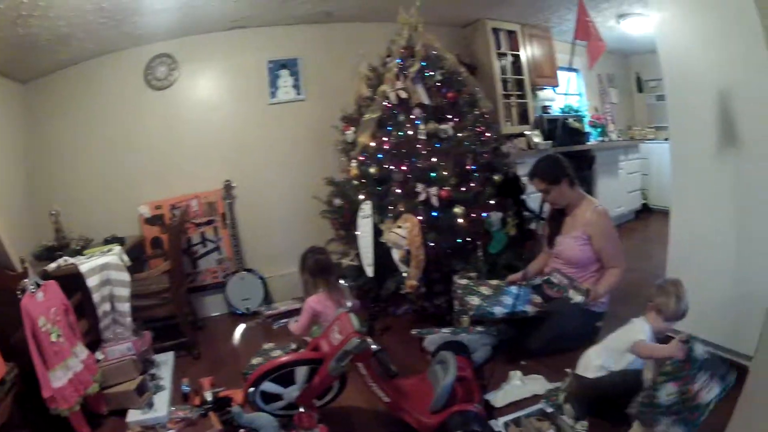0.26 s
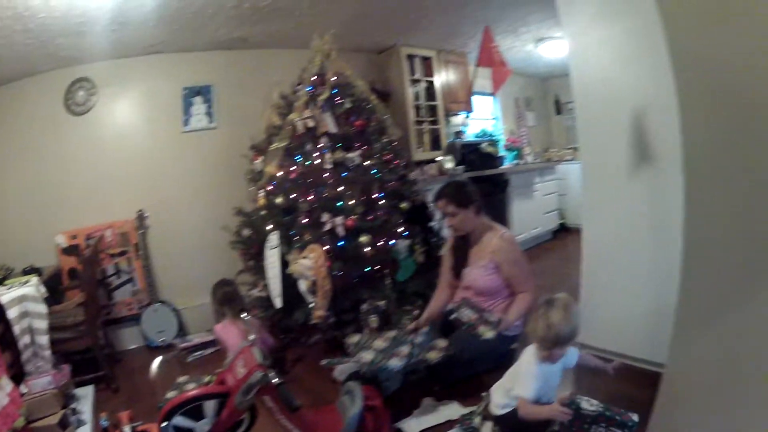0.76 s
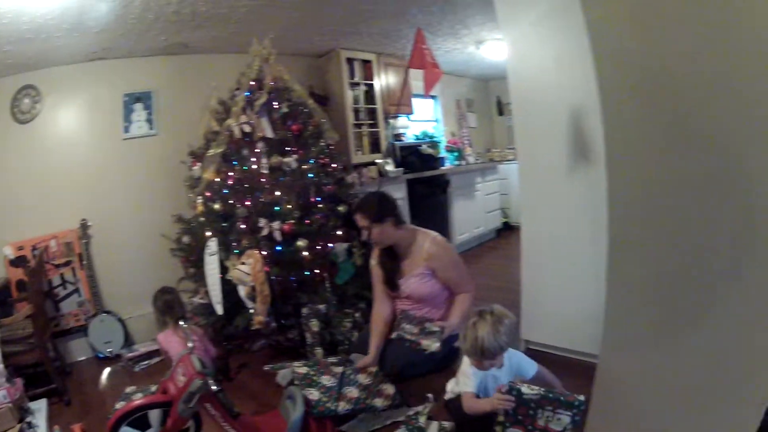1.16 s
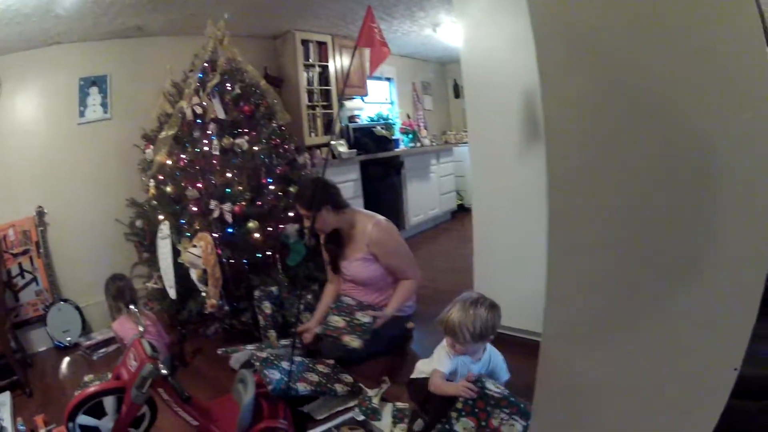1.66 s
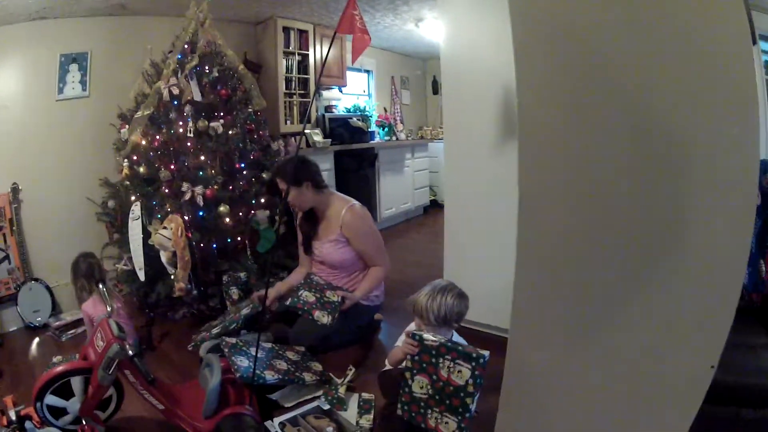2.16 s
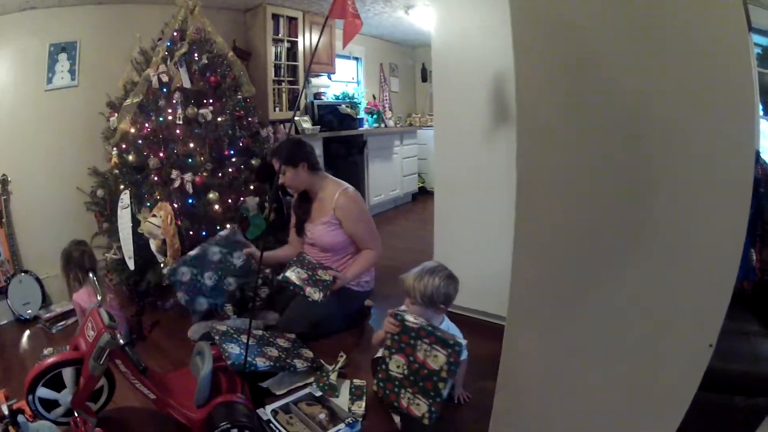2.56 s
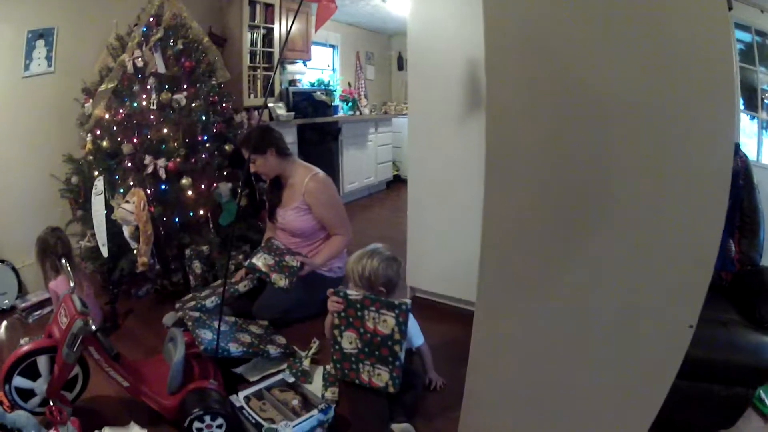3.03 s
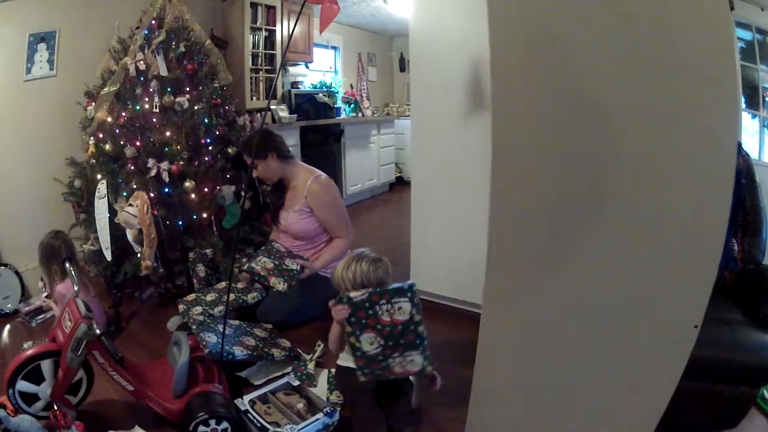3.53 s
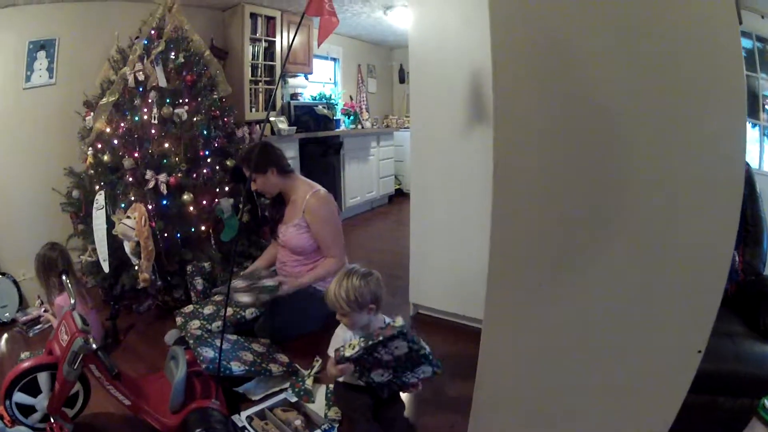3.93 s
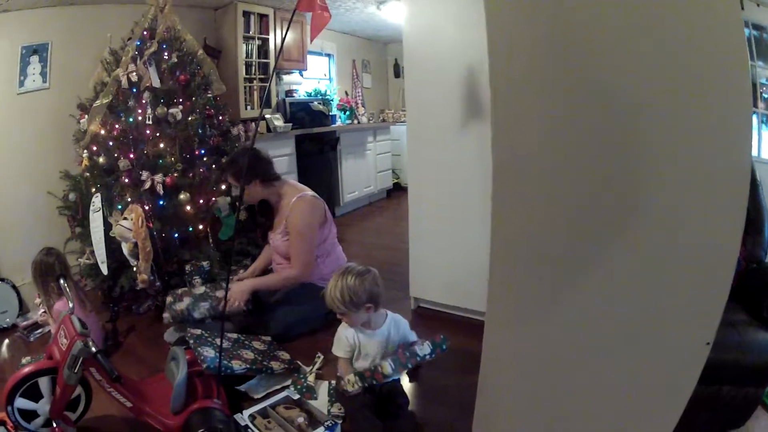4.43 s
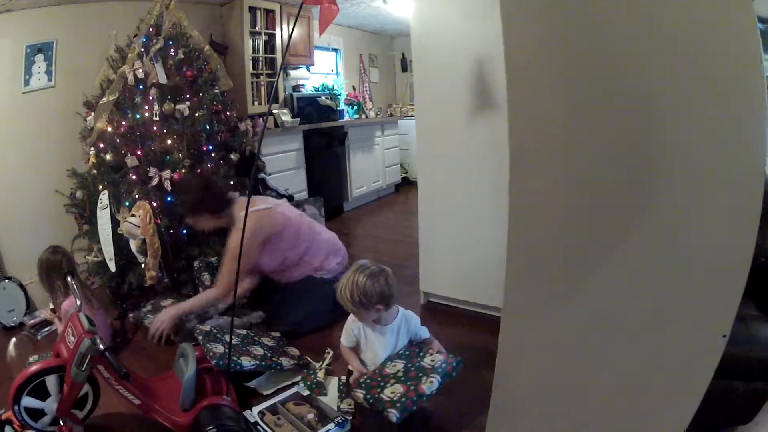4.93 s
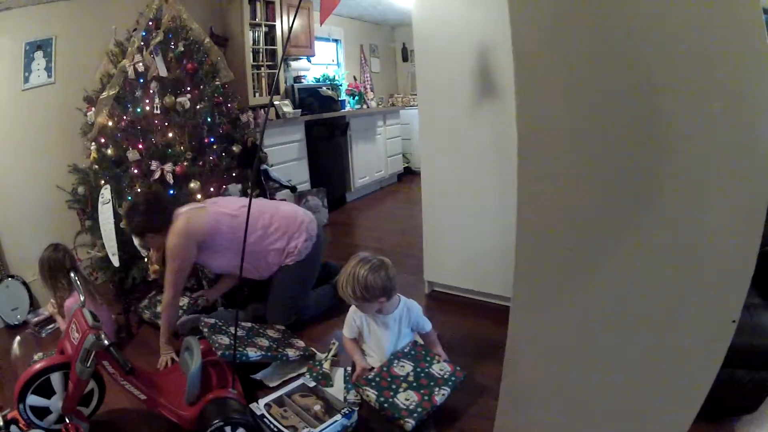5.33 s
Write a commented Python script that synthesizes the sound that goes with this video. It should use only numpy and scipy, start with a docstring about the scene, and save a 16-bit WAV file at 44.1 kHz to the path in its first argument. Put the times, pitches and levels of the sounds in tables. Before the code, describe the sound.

Presents are being handled on a hard floor: soft thump first, several boxy knocks, low woody scraping around two seconds, and the loudest bang just before three. After a quieter pause, paper crackles and scrunches with another knock past four seconds, then small taps and rustles. Faint house murmur, close room reflections, low camera bumps and a gritty treble edge from a cheap handheld microphone.

```python
"""A living room with a wooden floor, where wrapped presents are handled.
Hollow boxes knock (ringing modes) and slide (stick-slip grains through resonances).
Paper rustles, snaps, scrunches and squeaks; the room answers briefly over a steady murmur.
The small camera is nudged, samples slowly and holds each sample: a thin fizz above every sound."""
import sys
import numpy as np
from scipy import signal
from scipy.io import wavfile
from scipy.ndimage import uniform_filter1d

SR = 44100
rng = np.random.default_rng(int(sys.argv[2]) if len(sys.argv) > 2 else 0)


def pcm_store(signal):
    """Save signal as 16-bit PCM."""
    levels = np.round(np.clip(np.atleast_2d(signal), -1, 1) * 32767)
    wavfile.write(sys.argv[1], SR, levels.astype(np.int16).T)


N = 246519
TIME = np.arange(N) / SR
EVENT_T = np.arange(int(0.4 * SR)) / SR
ROOM_T60_S = 0.41


def amp(db):
    """Decibels to gain."""
    return 10 ** (np.asarray(db) / 20)


def unit(x):
    """Scales to an rms of one."""
    return x / np.sqrt(np.mean(x ** 2) + 1e-20)


def crest(x, size=441):
    """Scales so that the loudest hundredth of a second has an rms of one."""
    return x / np.sqrt(uniform_filter1d(x ** 2, size).max() + 1e-20)


def steady(x, size=1764):
    """Evens out the loudness, as the steady pressure of a hand does."""
    return x / np.sqrt(abs(uniform_filter1d(x ** 2, size)) + 1e-6 * np.mean(x ** 2))


def read(points, hz):
    """Reads a table on a log-frequency axis."""
    table_hz, value = np.transpose(points)
    return np.interp(np.log(hz + 1), np.log(table_hz + 1), value)


def add(mix, start_s, sound):
    """Adds a sound to the mix at start_s."""
    part = mix[max(round(start_s * SR), 0):][:len(sound)]
    part += sound[:len(part)]


def colour(x, points, tilt_db_per_oct=0, size=4096):
    """Minimum-phase filter with the given spectrum, tilted about 1 kHz."""
    hz = abs(np.fft.fftfreq(size, 1 / SR))
    octaves = np.log2(np.clip(hz, 100, 6000) / 1000)
    log_gain = np.log(amp(read(points, hz) + tilt_db_per_oct * octaves))
    spectrum = np.exp(np.conj(signal.hilbert(log_gain)))
    taps = np.fft.ifft(spectrum).real[:size // 2]
    return signal.oaconvolve(x, taps)[:len(x)]


def resonate(x, hz, width_hz):
    """A resonance of gain one at a fixed pitch, or following the curve hz."""
    r = np.exp(-np.pi * max(width_hz, 1) / SR)
    if np.ndim(hz) == 0:
        return 2 * signal.lfilter([1 - r], [1, -r * np.exp(2j * np.pi * hz / SR)], x).real
    turn = np.exp(2j * np.pi * np.cumsum(hz) / SR)
    # shift the note to 0 Hz, low-pass, shift back
    return 2 * (turn * signal.lfilter([1 - r], [1, -r], x / turn)).real


def grains(count, per_s, spread_db):
    """Random clicks of either sign, their levels spread exponentially in dB."""
    size, sign, chance = rng.random((3, count))
    hit = chance < per_s / SR
    level_db = spread_db * np.minimum(-np.log(size[hit]), 4)
    out = np.zeros(count)
    out[hit] = amp(level_db) * np.sign(sign[hit] - 0.5)
    return out


def room(x, wet_db, early_db=-1, early_s=0.0099, t60_s=ROOM_T60_S):
    """Direct sound, close reflections from floor and walls, and a short tail; new for every call."""
    taps = rng.standard_normal(len(EVENT_T)) * (EVENT_T > 0.002)
    tail = taps * np.exp(-np.log(1000) * EVENT_T / t60_s)
    early = taps * np.exp(-EVENT_T / early_s)
    response = tail / np.linalg.norm(tail) + amp(early_db) * early / np.linalg.norm(early)
    response = amp(wet_db) * response
    response[0] += 1
    return signal.fftconvolve(x, response)[:len(x)]


def crumple(decay_s, per_s, crackle_db):
    """One click followed by a dying run of others."""
    run = grains(len(EVENT_T), per_s, spread_db=3) * np.exp(-EVENT_T / max(decay_s, 0.001))
    run = amp(crackle_db) * run / (np.linalg.norm(run) + 1e-9)
    run[0] += 1
    return run


def ring(hz, t60_s):
    """One dying mode, as a turning and shrinking complex number."""
    return np.exp((2j * np.pi * hz - np.log(1000) / max(t60_s, 0.01)) * EVENT_T)


def pressure(rows, db, idle_db=-120, build=1.26, ease=1.8):
    """Each stroke of a hand builds up and eases off along a power curve; overlaps add in power."""
    power = amp(idle_db) ** 2
    for (start_s, swell_s, release_s, *_), peak in zip(rows, amp(db)):
        rise = np.clip((TIME - start_s) / swell_s, 0, 1)
        fall = np.clip(1 - (TIME - start_s - swell_s) / release_s, 0, 1)
        power = power + (peak * rise ** build * fall ** ease) ** 2
    return np.sqrt(power)


# murmur spectrum: (frequency [Hz], relative density [dB])
AIR_COLOUR = [(12, -45), (20, -2), (64, 2), (163, -0.5), (326, -0.5), (526, -0.5), (652, 0), (1240, -19),
              (1820, -20), (2150, -17), (3150, -14.5), (3810, -21.5), (5080, -19.5), (6000, -36.5),
              (7800, -61), (13200, -120)]


def air(level_db=-56.5):
    """Steady murmur of the house: coloured noise."""
    return amp(level_db) * unit(colour(rng.standard_normal(N), AIR_COLOUR))


# hand strokes over the wrapping: (time [s], swell [s], release [s], level before trim [dB])
RUSTLE_STROKES = [(-0.1, .33, .25, -56), (0.52, .05, 0.27, -66.5), (1.1, 0.036, 0.53, -58.5),
                  (1.43, 0.043, 0.54, -58.5), (1.68, 0.022, 0.29, -60), (1.79, 0.11, 0.93, -59),
                  (2.052, 0.066, 0.095, -50), (2.2, 0.1, 0.32, -58), (2.42, 0.052, 0.23, -54),
                  (2.74, 0.071, 0.2, -57), (3.2, .055, .4, -70), (3.79, 0.031, .25, -58.5),
                  (4.01, 0.052, 0.093, -63.5), (4.61, 0.076, .12, -62.5), (4.73, 0.061, 0.12, -58),
                  (4.91, 0.033, .25, -63.5), (5.24, 0.019, 0.33, -60.5), (5.43, 0.075, 0.14, -53.5)]
# paper spectrum, also for snaps, before tilt: (frequency [Hz], relative density [dB])
PAPER_COLOUR = [(300, -30), (900, -6.5), (1400, -2), (1800, -2.5), (2300, 4), (3100, 3), (3900, -5.5),
                (5000, -7), (6000, -25), (8000, -46.5)]


def rustle(trim_db=-1, layer_count=5, idle_db=-77.5):
    """Fine paper crackle: several random layers with room, summed for an even colour; never quite still."""
    *_, db = np.transpose(RUSTLE_STROKES)
    layers = sum(room(grains(N, per_s=90, spread_db=3), wet_db=-2) for _ in range(layer_count))
    crackle = colour(layers, PAPER_COLOUR, tilt_db_per_oct=5)
    return pressure(RUSTLE_STROKES, db + trim_db, idle_db) * steady(crackle, size=4410)


# box pushes along the floor:
# (time [s], swell [s], release [s], level [dB], hollow note [Hz], lid hum before trim [dB])
SLIDE_PUSHES = [(0.72, 0.018, 0.17, -69, 445, -50.5), (0.85, 0.031, 0.54, -56, 490, -61),
                (0.95, 0.027, 0.035, -53.5, 457, -59), (1.14, 0.1, 0.11, -46.5, 333, -35),
                (1.426, 0.042, 0.27, -60, 345, -37), (1.588, .015, .12, -49.5, 352, -42),
                (1.81, 0.049, 0.14, -54.5, 430, -47.5), (1.91, 0.11, 0.2, -38.5, 435, -35),
                (2.06, 0.057, 0.12, -30, 340, -33), (2.15, 0.08, 0.3, -46, 310, -64),
                (2.22, 0.17, 0.65, -44, 400, -52), (2.43, 0.057, 0.088, -36, 474, -66),
                (2.6, 0.042, 0.056, -49, 560, -62.5), (3.145, 0.03, 0.043, -62, 428, -51),
                (3.235, 0.038, 0.11, -48.5, 348, -62), (3.76, .14, 0.12, -48, 380, -70),
                (4.02, 0.054, 0.046, -52.5, 560, -66), (4.1, 0.03, 0.043, -47.5, 480, -70),
                (4.29, 0.072, 0.16, -42.5, 466, -57), (4.68, 0.035, 0.1, -47.5, 447, -54),
                (4.754, 0.031, 0.13, -41.5, 340, -52), (5.459, 0.049, 0.24, -45, 350, -57)]
# wall resonances of a sliding box: (frequency [Hz], width [Hz], gain [dB])
SLIDE_WALLS = [(299, 11.7, 2.5), (441, 22, 3), (642, 26, -2)]
# rubbing spectrum: (frequency [Hz], relative density [dB])
RUB_COLOUR = [(60, -38), (140, -14.5), (220, 2.5), (330, -7.5), (480, -5), (680, -4), (850, -4.5),
              (1100, -21), (1600, -27), (3000, -68), (6000, -65)]


def slides(hollow_db=-5, hollow_width_hz=50, lid_trim_db=-2, lid_hz=345, lid_width_hz=10, idle_db=-69):
    """Cardboard sticks and slips: dense little jerks drive the hollow box, its walls and its lid."""
    start_s, swell_s, _, db, note_hz, hum_db = np.transpose(SLIDE_PUSHES)
    jerks = room(grains(N, per_s=900, spread_db=-1), wet_db=-0.5)
    body = colour(jerks, RUB_COLOUR)
    walls = sum(amp(gain_db) * resonate(body, hz, width_hz) for hz, width_hz, gain_db in SLIDE_WALLS)
    # the note glides from push to push
    hollow = resonate(body, np.interp(TIME, start_s + swell_s, note_hz), hollow_width_hz)
    rub = steady(unit(body) + unit(walls) + amp(hollow_db) * unit(hollow))
    lid = steady(resonate(body, lid_hz, lid_width_hz))
    rub = rub * pressure(SLIDE_PUSHES, db, idle_db)
    return rub + lid * pressure(SLIDE_PUSHES, hum_db + lid_trim_db)


# camera body nudges: (time [s], envelope peak [dB], frequency [Hz], decay time constant [s])
CAMERA_NUDGES = [(0.13, -40, 60.4, 0.084), (5.214, -39, 28.5, 0.06)]


def nudges(rise_s=0.014):
    """Deep, soft wobbles of the hand-held camera: swelling, dying low sines."""
    out = np.zeros(N)
    for start_s, db, hz, decay_s in CAMERA_NUDGES:
        swell = (1 - np.exp(-EVENT_T / rise_s)) * np.exp(-EVENT_T / decay_s)
        wobble = swell / swell.max() * np.sin(2 * np.pi * hz * EVENT_T)
        add(out, start_s, -amp(db) * wobble)
    return out


# slap spectrum: (frequency [Hz], relative density [dB])
SLAP_COLOUR = [(500, -17), (1300, -21.5), (1700, -19), (2300, -11), (2900, -5), (3400, -11), (4000, -21),
               (5000, -23), (6000, -37), (8000, -66)]


def wrapping_slap(layer_count=4):
    """The wrapping slaps: several random crumples summed for an even spectrum."""
    layers = sum(room(crumple(decay_s=0.0014, per_s=2500, crackle_db=8.5), wet_db=9.5)
                 for _ in range(layer_count))
    return colour(layers, SLAP_COLOUR)


# box landings, levels before trim:
# (time [s], box [dB], panel note [Hz], floor thump [dB], paper slap [dB], panel ring re blow [dB],
#  brightness [dB/octave], landing time constant [s])
BOX_KNOCKS = [(0.167, -23.5, 249.6, -30, -54, -5.5, -4.5, 0.0025),
              (0.196, -31.5, 234, -36, -48.5, 4.5, 7, 0.0038), (0.772, -38, 430, -65, -70, -9, 2.5, 0.0016),
              (1.033, -16.5, 482, -52, -42, -17, -3, 0.0019),
              (1.04, -18, 196, -38, -43, -7.5, -0.5, 0.0063),
              (1.215, -30.5, 248, -43, -57, -1.5, 1, 0.0025),
              (1.293, -13.5, 229.8, -39.5, -42.5, -5.5, -4, 0.0027),
              (1.308, -9.5, 345, -39, -39.5, 1.5, -2.5, 0.0028),
              (1.522, -25.5, 339, -42.5, -58, -8, 1.5, 0.0015), (1.602, -34, 345, -48, -66, 9, 1, 0.001),
              (1.658, -29, 188, -46.5, -56, 1, -1.5, 0.0045), (2.606, -38, 690, -67, -54, -4, 10.5, 0.0022),
              (2.835, -0.5, 331.3, -35, -23.5, -9, 1, 0.0025), (2.847, -14.5, 303, -31, -35, -7, 4, 0.0017),
              (3.233, -45, 667, -91, -62, 6, 6, 0.00096), (3.329, -54, 640, -65, -76, 6, -3, 0.0022),
              (3.74, -40.5, 320, -51, -73, -4, 3.5, 0.0018), (3.78, -38.5, 307, -74, -61, -9, -0.5, 0.0021),
              (4.253, -32.5, 642, -48, -41, -4, 10, 0.0051),
              (4.267, -25, 639.4, -55, -45, -5.5, -2.5, 0.0042),
              (4.408, -14.5, 207.4, -31, -38, -7.5, -3.5, 0.0019),
              (4.777, -35, 327, -62, -76, 1, 1, 0.0021), (5.115, -22, 253.5, -49, -46, -6, -3, 0.0053),
              (5.534, -25, 228, -48, -72, -4, -4.5, 0.00082)]
# cardboard box modes: (frequency [Hz], relative level before tilt [dB], t60 [s])
BOX_RINGS = [(185, 1.5, 0.12), (225, -9.5, 0.26), (339, 8.5, 0.08), (501, -17, 0.15), (582, 1.5, 0.23),
             (680, -4, 0.45), (752, -6, 0.2), (815, -12.5, 0.29), (886, -20, 0.31), (880, -46, 0.81),
             (1020, -23, 0.2)]
# blow spectrum before tilt: (frequency [Hz], relative density [dB])
BLOW_COLOUR = [(60, -51), (130, -10.5), (190, 0), (250, -0.5), (330, 7), (480, 3), (700, 0), (900, -10.5),
               (1100, -20.5), (1600, -30), (3000, -73)]
# floor thump spectrum: (frequency [Hz], relative density [dB])
THUMP_COLOUR = [(20, -11), (45, -2), (65, 5), (110, 2), (160, -1.5), (300, -59), (800, -81)]


def knocks(walls_db=-4, panel_t60_s=0.2, box_trim_db=-7, thump_trim_db=-3, slap_trim_db=-3):
    """A box lands: a hollow blow, its ringing walls, a thump in the floor and a slap of the wrapping."""
    out, click = np.zeros(N), signal.unit_impulse(len(EVENT_T))
    box_push, floor_push = colour(click, BLOW_COLOUR), colour(click, THUMP_COLOUR)
    mode_hz, mode_db, _ = np.transpose(BOX_RINGS)
    modes = np.array([ring(hz, t60_s) for hz, _, t60_s in BOX_RINGS])
    for start_s, db, note_hz, thump_db, slap_db, panel_db, tilt_db, landing_s in BOX_KNOCKS:
        # a box that meets the floor edge first swells more slowly
        rise = 1 - np.exp(-EVENT_T / max(landing_s, 0.0003))
        # each mode starts at a random phase
        phase = np.exp(2j * np.pi * rng.random(len(modes)))
        mode_gain = amp(mode_db + tilt_db * np.log2(mode_hz / note_hz))
        walls = ((phase * mode_gain) @ modes).real
        tilted_push = colour(box_push, [(100, 0.012), (6000, 0)], tilt_db)  # near-flat: tilt only
        blow = room(tilted_push, wet_db=-0.5, t60_s=0.33)
        panel = ring(note_hz, panel_t60_s).imag
        hollow = crest(blow) + amp(walls_db) * crest(walls) + amp(panel_db) * crest(panel)
        thump = room(floor_push, wet_db=6.5)
        slap = wrapping_slap()
        add(out, start_s, amp(db + box_trim_db) * crest(rise * hollow))
        add(out, start_s, amp(thump_db + thump_trim_db) * crest(rise * thump))
        add(out, start_s, amp(slap_db + slap_trim_db) * crest(rise * slap))
    return out


# paper snaps, levels before trim:
# (time [s], level [dB], crumple time constant [s], brightness [dB/octave], sheet flap [dB])
PAPER_SNAPS = [(0.4081, -32, 0.036, -7.5, -43), (0.4189, -35.5, 0.0057, -3.5, -39),
               (0.4328, -36.5, 0.0071, -6, -41), (0.4534, -36.5, 0.0057, -1, -53),
               (0.4757, -36.5, 0.011, -4.5, -41.5), (0.8076, -37.5, 0.001, 1.5, -67),
               (0.8291, -48, 0.008, -4.5, -51), (1.286, -41, 0.015, 6, -67),
               (2.1845, -36, 0.0064, 7, -43.5), (2.2112, -38.5, 0.005, -9, -57),
               (2.5411, -34.5, 0.0038, -9.5, -34), (2.7333, -31, 0.01, -1.5, -35.5),
               (2.7422, -33, 0.027, 2, -40), (3.506, -50, 0.008, 7, -74), (3.569, -50, 0.0069, -4, -78),
               (3.7448, -45, 0.012, 17, -53), (3.8252, -46.5, 0.011, 7, -49.5),
               (3.992, -48.5, 0.0038, 6, -67), (4.033, -52.5, 0.004, -2, -53),
               (4.2487, -35.5, 0.02, -2, -32), (4.356, -46.5, 0.011, 14, -60),
               (4.5157, -43.5, 0.033, 9.5, -42.5), (4.8274, -47.5, 0.021, -1, -49),
               (4.91, -55, 0.006, -3, -57.5), (5.231, -37, 0.0025, 0.5, -46),
               (5.4076, -49.5, 0.0072, 1, -55), (5.5074, -41, 0.0032, 1, -71)]
# sheet flap spectrum: (frequency [Hz], relative density [dB])
FLAP_COLOUR = [(60, -35), (200, 4.5), (400, 1), (680, 5.5), (850, 10.5), (1100, -17), (2000, -33.5),
               (6000, -40.5)]


def snaps(snap_trim_db=-8, flap_trim_db=-4):
    """A crease buckles in a run of clicks, and the sheet around it flaps."""
    out = np.zeros(N)
    for start_s, db, decay_s, tilt_db, flap_db in PAPER_SNAPS:
        run = room(crumple(decay_s, per_s=770, crackle_db=-2), wet_db=-0.5)
        snap = colour(run, PAPER_COLOUR, tilt_db)
        flap = colour(run, FLAP_COLOUR)
        add(out, start_s, amp(db + snap_trim_db) * crest(snap))
        add(out, start_s, amp(flap_db + flap_trim_db) * crest(flap))
    return out


# sheet-scrunching grips: (time [s], swell [s], release [s], level before trim [dB])
SCRUNCH_GRIPS = [(4.236, 0.0064, 0.37, -49.5), (4.404, 0.0072, 0.15, -43)]
# scrunch spectrum: (frequency [Hz], relative density [dB])
SCRUNCH_COLOUR = [(400, 6), (1400, -5.5), (2300, 3), (3200, -4.5), (4200, 0.5), (5400, 3.5), (6000, -21),
                  (8000, -34)]


def scrunches(trim_db=1):
    """A gripped sheet gives way in many separate bright crackles."""
    *_, db = np.transpose(SCRUNCH_GRIPS)
    creases = grains(N, per_s=400, spread_db=1.5)
    crackle = colour(room(creases, wet_db=-8), SCRUNCH_COLOUR)
    return pressure(SCRUNCH_GRIPS, db + trim_db) * steady(crackle, size=2646)


# finger drags over glossy paper: (time [s], swell [s], release [s], level [dB])
SQUEAK_DRAGS = [(4.79, 0.041, 0.11, -55.5)]


def squeaks(note_hz=2270, width_hz=45):
    """A finger sticks and slips on the paper in a narrow, fuzzy note: resonated noise."""
    *_, db = np.transpose(SQUEAK_DRAGS)
    note = resonate(rng.standard_normal(N), note_hz, width_hz)
    return pressure(SQUEAK_DRAGS, db) * steady(note)


def scene():
    """Boxes, paper and the quiet room at one microphone."""
    handling = rustle() + slides() + knocks() + snaps() + scrunches() + squeaks()
    return (air() + nudges() + handling)[None]


def record(dry, hold_hz=12000, hold_count=4, edge_hz=15450):
    """Slow sampling: each held sample mirrors the sound into the treble, cut off above edge_hz."""
    fast_hz = hold_hz * hold_count
    fast = signal.resample_poly(dry, fast_hz, SR, axis=1)
    held = np.repeat(fast[:, ::hold_count], hold_count, axis=1)
    steps = signal.resample_poly(held, SR, fast_hz, axis=1)[:, :N]
    low_pass = signal.firwin(511, edge_hz, window=("kaiser", 9), fs=SR)
    return signal.oaconvolve(steps, low_pass[None], "same")


dry = scene()
out = record(dry)
pcm_store(out)
```